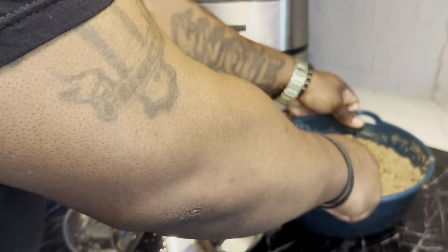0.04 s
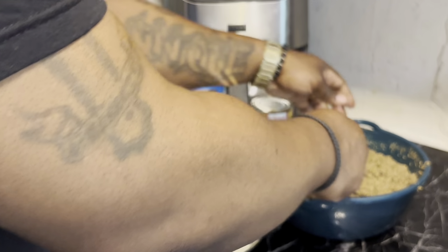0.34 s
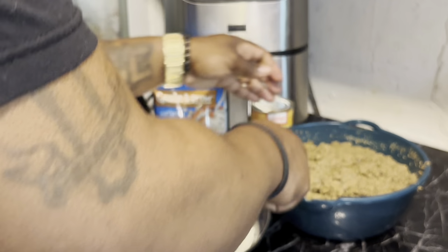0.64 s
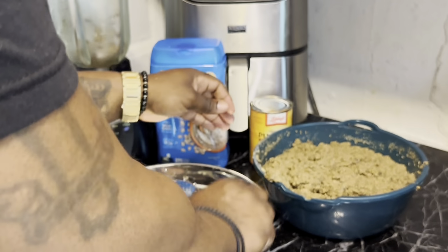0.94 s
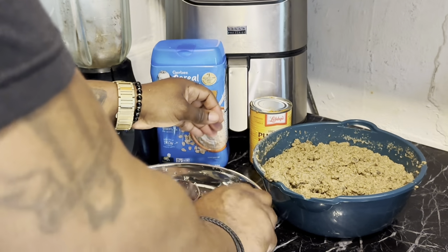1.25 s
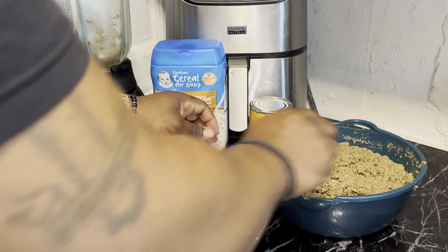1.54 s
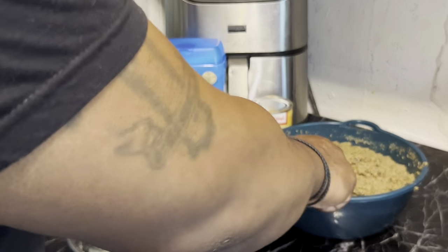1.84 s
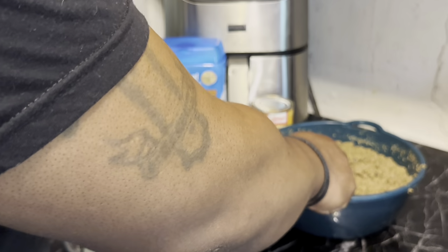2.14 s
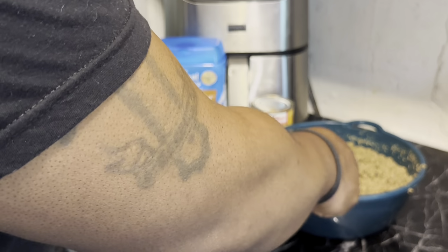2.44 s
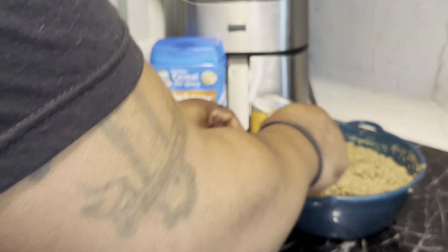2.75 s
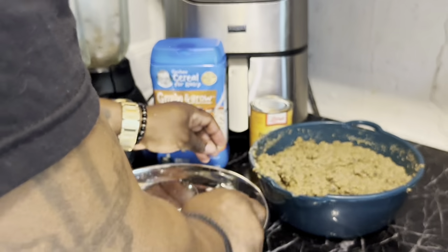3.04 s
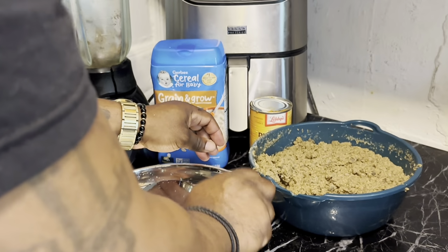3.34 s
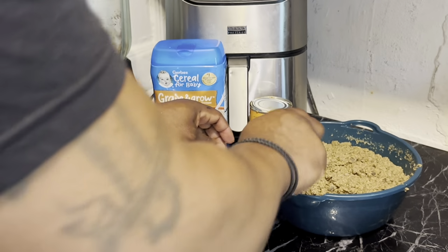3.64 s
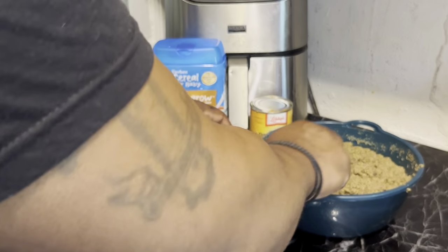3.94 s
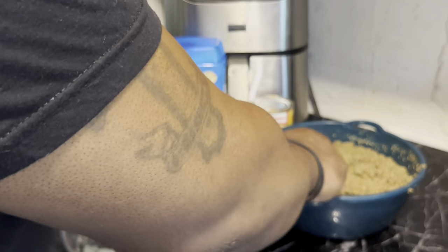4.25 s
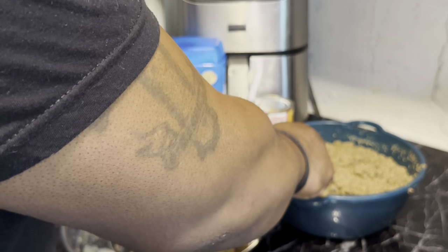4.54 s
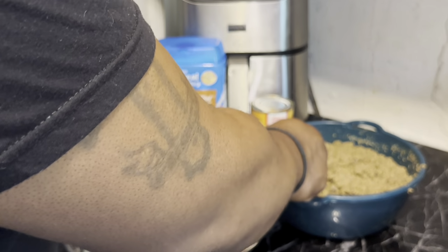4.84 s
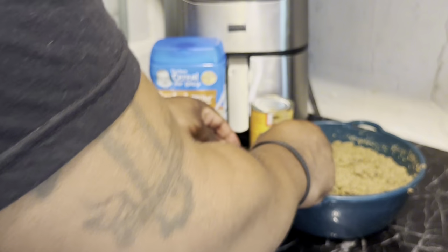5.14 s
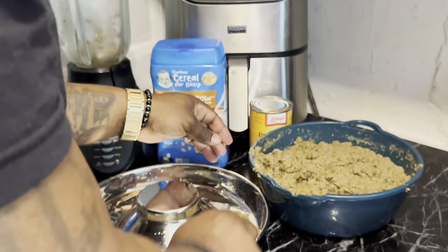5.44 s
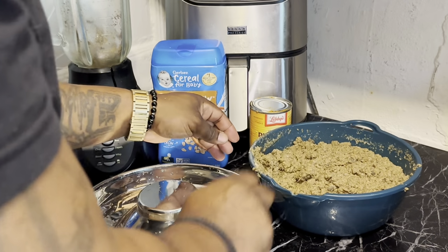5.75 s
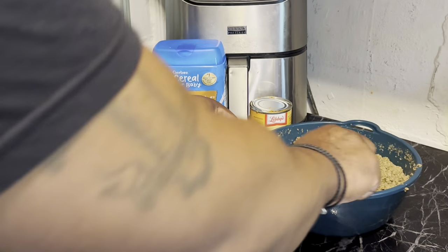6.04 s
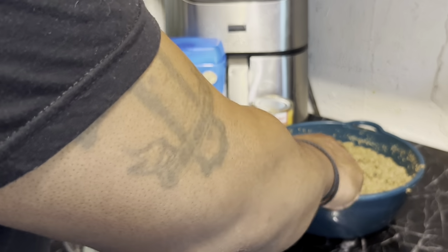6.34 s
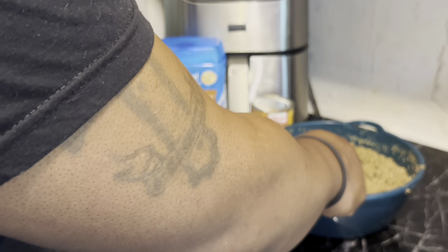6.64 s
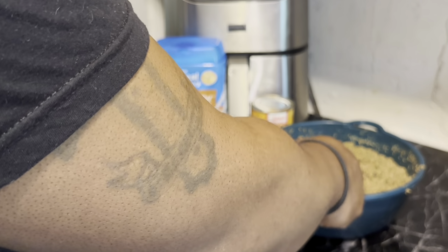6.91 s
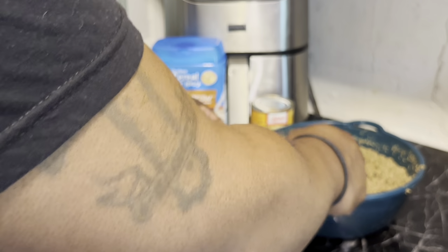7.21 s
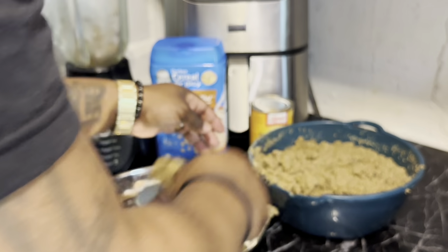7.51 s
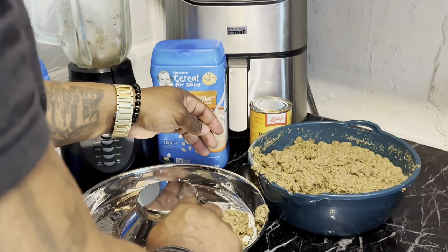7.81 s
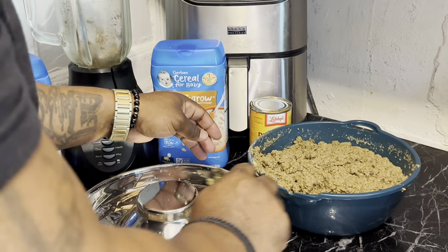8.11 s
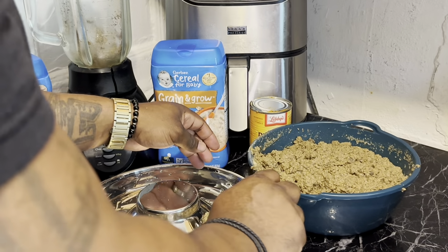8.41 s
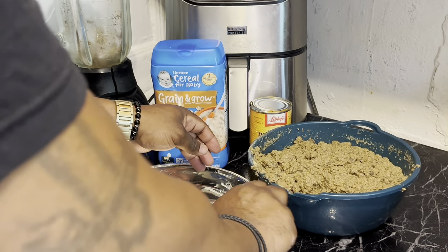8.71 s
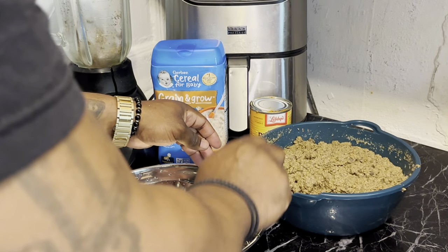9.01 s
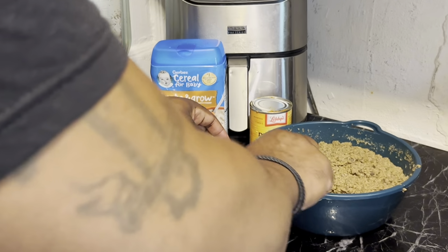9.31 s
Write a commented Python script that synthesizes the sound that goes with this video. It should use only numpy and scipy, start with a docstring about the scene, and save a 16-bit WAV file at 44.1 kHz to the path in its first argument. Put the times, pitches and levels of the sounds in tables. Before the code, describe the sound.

A metal scoop softly digs moist, crumbly food from a plastic tub and knocks and clinks against a steel bowl in a small kitchen.

```python
"""A metal scoop digs moist, crumbly food out of a plastic tub, which bumps on the counter.
At 1 s the scoop is knocked on a steel bowl: the bowl thuds and both metals ring. More digging
follows, and at 3 s and 5.5 s the full scoop chatters along the bowl's wall, muffled by food.
After a last dig, a hard knock lands on the bowl's bottom at 7.7 s and a light clink comes at 8.7 s.
All along, a small kitchen echoes briefly and an appliance hums softly."""
import sys
import numpy as np
from scipy import signal
from scipy.fft import rfft, irfft, next_fast_len
from scipy.io import wavfile
from scipy.ndimage import map_coordinates

SR = 44100
rng = np.random.default_rng(int(sys.argv[2]) if len(sys.argv) > 2 else 0)


def wav_record(signal):
    """Record a signal, one row per channel, as 16-bit PCM in the file named by sys.argv[1]."""
    frames = np.transpose(np.atleast_2d(signal))
    bounded = np.clip(frames, -1, 1)
    # unit amplitude maps onto the largest positive 16-bit level
    quanta = np.round(bounded * 32767).astype(np.int16)
    wavfile.write(sys.argv[1], SR, quanta)


N = 413216

# The scoop hits the bowl. A fade time, or t60, is how long a sound takes to drop by 60 dB.
# t/s, knock/dB, clack/dB, clack pitch/Hz, clack fade/s, bowl ring/dB, place (0 wall, 1 bottom),
# scoop ring/dB, time until the hand damps the ring/s, time until the bounce/s
BLOWS = [(1.0164, -3.5, -11, 1310, 0.064, -24.5, 0.092, -47.5, 0.19, 0.0027),
         (7.6526, 0, -18.5, 1800, 0.079, -21.5, 1, -58, 0.33, 0.026),
         (8.711, -35, -16.5, 2180, 0.11, -51, .1, -35.5, 0.24, .004)]


def scoop_blows():
    """The scoop hits the bowl and bounces once, lighter and brighter; both ring until a hand damps them."""
    out = np.zeros(N)
    for s, knock_db, clack_db, clack_hz, clack_t60, bowl_db, place, scoop_db, free_s, bounce_s in BLOWS:
        add(out, s, contact(knock_db, clack_db, clack_hz, clack_t60))
        add(out, s, metal_ring(bowl_db, place, scoop_db, free_s, damping_t60=0.97))
        add(out, s + bounce_s, contact(knock_db - 18, clack_db - 12, clack_hz=5600, clack_t60=clack_t60))
    return out


# Light touches along the bowl's wall: t/s, clack level/dB, clack pitch/Hz
CHATTER = [(2.993, -24.5, 5570), (3.0135, -26, 1340), (3.031, -23, 5010), (3.044, -24, 8820),
           (3.056, -28, 3050), (3.062, -25, 5500), (3.0846, -22, 3700), (3.089, -27, 1340),
           (5.4903, -21.5, 4370), (5.496, -18.5, 1296)]


def scoop_chatter():
    """The full scoop rattles along the wall, and the food starts to muffle the ring almost at once."""
    out = np.zeros(N)
    for s, db, hz in CHATTER:
        add(out, s, contact(knock_db=db - 22, clack_db=db, clack_hz=hz, clack_t60=0.063, flex_db=-1.5))
        add(out, s, metal_ring(db - 26, place=0, scoop_db=db - 30.5, free_s=0.0088, damping_t60=0.34))
    return out


# The tone of a dull knock and of a bright clack: f/Hz, level/dB
KNOCK_TONE = [(60, -40), (190, -47), (310, -6.5), (480, 3), (780, -3), (1020, -4.5), (1420, -0.5),
              (2000, -14), (4000, -29.5), (15000, -62)]
CLACK_TONE = [(150, -5.5), (750, -13.5), (1050, -3.5), (1400, 0.5), (1800, -4.5), (2300, -5.5), (3050, -1),
              (3800, -13.5), (4700, -12), (5600, -5), (6800, -10.5), (10000, -13.5), (15000, -14.5)]


def contact(knock_db, clack_db, clack_hz, clack_t60, flex_db=-3):
    """Metal meets metal: a patch of wall bends to and fro briefly, with a knock and a clack."""
    hz = np.geomspace(100, 16000, 120)
    # the spot that is hit favours the pitches near clack_hz
    lift_db = 8 * np.exp(-(np.log2(hz / clack_hz) / 0.28) ** 2)
    tone = np.transpose([hz, along(CLACK_TONE, hz) + lift_db])
    out = swing(clack_db + flex_db, clack_hz, t60=0.034)
    add(out, 0, amp(knock_db) * burst(KNOCK_TONE, t60=0.023))
    add(out, 0, amp(clack_db) * burst(tone, clack_t60, rise_s=0.00091))
    return out


# The steel bowl's own notes: f/Hz, level if hit on the wall/dB, level if hit on the bottom/dB, fade/s
BOWL_NOTES = [(309.4, -2.5, -1.5, 0.28), (419, 12, -24, 0.097), (562, -15, -3, 0.63),
              (1072, -27, -19, 0.55), (1100, -34, -24, 0.18), (1355, -4, -17.5, 0.31), (1398, 2, -3, 0.17),
              (1435, -8, 0, 0.23), (1516, -15, -3, 0.21), (1570, -35, -25, 0.64), (1640, -21, -24, 1),
              (1877, -6.5, -12, 0.44), (2545, -22, -28, 0.8), (2580, -12, -34, 0.82), (2780, -21, -41, 1),
              (2970, -8.5, -36, 0.38), (3050, -18, -8, 0.24), (3260, -4, -20, 0.23), (3440, -21, -49, 1),
              (3910, 1, -13, 0.057), (4160, -33, -49, 0.57), (4750, -20.5, -49, 0.73),
              (4800, -27, -42, 0.26), (4940, -17, -47, 0.77), (5570, -4, -13, 0.076), (6200, -21, -45, .33),
              (6050, -24, -44, 0.14), (6370, -25, -48, 0.56), (8400, -15, -36, 0.27)]
# The metal scoop's own notes: f/Hz, level/dB, fade/s
SCOOP_NOTES = [(1500, -9, 0.13), (1820, -7.5, 2.2), (1890, -31, 0.54), (2120, -13, 2.3), (2396, -6, 0.44),
               (2830, -9, 0.72), (3130, -11, 0.61), (4100, 4, 0.32), (4190, 10, 0.14), (4260, -2.5, 0.47),
               (4570, -17, 0.41), (5450, -18, 0.53), (5803, -9, 0.44), (6300, -15, 0.21), (6600, -3, 0.41),
               (7154, -2, 0.3), (7960, -12, 0.37), (8140, -2, .25), (9450, -19, 0.18), (12670, 1, 0.22),
               (12900, -12, 0.29), (13500, -17, .27), (13800, -18, .24)]


def metal_ring(bowl_db, place, scoop_db, free_s, damping_t60):
    """Bowl and scoop ring freely, then die away faster once something soft rests on them."""
    hz, wall_db, bottom_db, t60 = np.transpose(BOWL_NOTES)
    note_db = wall_db + place * (bottom_db - wall_db)  # the bottom favours the low notes
    out = amp(bowl_db) * beating_notes(hz, note_db, t60)
    out += amp(scoop_db) * beating_notes(*np.transpose(SCOOP_NOTES))
    # the scoop's many weaker notes blur into a jangle
    add(out, 0, amp(scoop_db + 2) * burst(CLACK_TONE, t60=0.35))
    touched_s = np.maximum(clock(len(out)) - free_s, 0)
    return out * fade(touched_s, damping_t60)


def beating_notes(hz, db, t60, detune=0.008):
    """The metal is not quite round, so each note has a close twin that makes it waver."""
    hz, db, t60 = hz[:, None], db[:, None], t60[:, None]
    gain = amp(db + rng.standard_normal(hz.shape))
    t = clock(SR * 3 // 4)
    phase = 2 * np.pi * hz * t
    twin = 0.67 * np.cos(phase * (1 + detune * rng.standard_normal(hz.shape)))
    sign = rng.choice([-1, 1], hz.shape)
    return np.sum(gain * sign * fade(t, t60) * (np.sin(phase) + twin), axis=0)


# The bowl is pushed against the counter: t/s, level/dB, f/Hz
THUDS = [(1.0172, -2.5, 350), (2.995, -22, 342), (5.53, -33, 330), (7.653, -5.5, 476), (8.712, -30, 311)]
# The notes in one thud: multiple of its pitch, level/dB, fade/s
THUD_NOTES = [(1, 1, 0.059), (1.2, -6, 0.055), (1.43, -1, .036), (2.3, 6, 0.017)]


def bowl_thuds():
    """The loaded bowl thuds on the counter; the lighter the thud, the duller it sounds."""
    out = np.zeros(N)
    for s, db, hz in THUDS:
        for multiple, note_db, t60 in THUD_NOTES:
            dulling_db = 0.38 * db * np.log2(multiple)
            add(out, s, swing(db + note_db + dulling_db, hz * multiple, t60))
    return out


# The scoop taps or scrapes the tub and the packed food: t/s, level/dB, strongest f/Hz, fade/s
DIGS = [(.015, -32, 7040, 0.021), (.102, -25.5, 2510, 0.033), (0.1263, -20, 560, 0.036),
        (.146, -35, 650, 0.039), (.338, -40, 1500, 0.065), (1.7899, -28.5, 1950, 0.059),
        (1.847, -31, 1230, 0.071), (4.25, -35.5, 5060, 0.1), (4.402, -40, 4320, 0.14),
        (5.71, -44, 447, 0.28), (6.157, -39.5, 6460, .03), (6.221, -27.5, 3650, 0.023),
        (6.331, -32.5, 5550, 0.11), (6.391, -32, 1900, 0.038), (7.086, -39, 440, 0.12),
        (7.19, -44, 330, .1), (7.29, -42, 450, 0.13), (7.35, -42, 350, 0.068)]


def tub_taps():
    """Plastic does not ring, so each tap or scrape is a short puff of noise around one pitch."""
    out = np.zeros(N)
    for s, db, hz, t60 in DIGS:
        hump = [(hz / 6, -17), (hz / 1.48, -2), (hz, 0), (hz * 1.32, -4), (hz * 4, -22), (hz * 16, -40)]
        add(out, s, amp(db) * burst(hump, t60, rise_s=t60 / 45))
    return out


# The tub or the bowl rocks on the counter: t/s, level/dB, f/Hz
BUMPS = [(.111, -19, 138), (0.126, -17, 344), (.132, -20, 136), (.141, -18.5, 63), (.146, -20, 198),
         (7.655, -10, 223), (7.721, -26.5, 75)]


def counter_bumps(cycles=9.2):
    """Each rock on the counter gives a dull bump that dies away in a few swings."""
    out = np.zeros(N)
    for s, db, hz in BUMPS:
        add(out, s, swing(db, hz, t60=cycles / hz, rise_s=0.0016))
    return out


# The scoop presses into the food: t/s, length/s, crumbling/dB, wet crackle/dB
PRESSES = [(0, 0.026, -43.5, -46), (0.108, 0.15, -48, -49.5), (0.311, 0.082, -56.5, -50.5),
           (0.617, 0.027, -69, -57), (0.755, .04, -53.5, -60), (1.704, 0.31, -53.5, -55.5),
           (1.8, 0.11, -52, -53.5), (2.297, 0.34, -62.5, -61.5), (2.43, 0.048, -56.5, -61),
           (2.798, .035, -58.5, -63), (3.83, 0.17, -64, -63.5), (4.265, 0.19, -53.5, -52),
           (4.547, 0.23, -64, -59.5), (5.46, .04, -47.5, -58), (6.16, 0.08, -45, -47),
           (6.305, .07, -48.5, -55), (6.48, 0.36, -60.5, -68), (6.995, 0.33, -66, -69)]
# Moist food lets go with a tick: t/s, level/dB
TICKS = [(0.6214, -45), (0.7682, -39), (0.845, -50), (0.8889, -41.5), (2.4524, -35), (2.8105, -45),
         (2.8923, -47), (4.1744, -54), (4.8653, -47), (6.5114, -38), (6.6214, -48), (6.782, -52),
         (6.9162, -59), (7.0135, -46), (7.3058, -52), (7.3322, -50)]
# The tone of breaking crumbs, dull mush and wet smacks: f/Hz, level/dB
CRUMB_TONE = [(150, -2), (450, -23), (900, -8.5), (1700, -5), (2400, -3.5), (3200, -6), (4700, -2.5),
              (6500, 3.5), (9000, -6.5), (12000, -21), (16000, -11)]
MUSH_TONE = [(100, -15), (250, -1.5), (450, -4), (900, 2.5), (1500, -28), (4000, -27)]
SMACK_TONE = [(3000, -41), (6500, -11), (9000, -3), (14500, 3), (16000, 6.5)]


def food():
    """The moist food crumbles under the scoop, gives way dully, and crackles as it comes unstuck."""
    crumbling, wetness = np.zeros(N), np.zeros(N)
    for s, length_s, crumbling_db, wetness_db in PRESSES:
        add(crumbling, s, amp(crumbling_db) * press(length_s))
        add(wetness, s, amp(wetness_db) * press(length_s))
    crumbs = amp(-2) * tiny_pops(CRUMB_TONE, per_s=2000, spread_db=4, centre_hz=4310, cycles=3.9)
    mush = amp(-4) * tiny_pops(MUSH_TONE, per_s=500, spread_db=6, centre_hz=700, cycles=0.6)
    smacks = amp(-2) * tiny_pops(SMACK_TONE, per_s=1600, spread_db=3, centre_hz=11000, cycles=1.7)
    wetness *= amp(2.5 * wobble(per_s=35))  # the crackle comes in spurts
    yielding = amp(1.5 * wobble(per_s=24))  # the food gives way in fits and starts
    out = yielding * (crumbling * (crumbs + mush) + wetness * smacks)
    for s, db in TICKS:
        add(out, s, amp(db - 1.5) * burst(SMACK_TONE, t60=0.05))
    return out


# The scoop slides through the food: t/s, length/s, level/dB
SLIDES = [(1.797, 0.14, -58), (2.402, 0.24, -73), (4.298, 0.6, -59.5), (6.206, 0.54, -61),
          (6.942, 0.44, -62)]
# The tone of the sliding scoop, with two peaks: f/Hz, level/dB
RUB_TONE = [(500, -25), (1500, -11.5), (1900, -11), (2450, -2), (3100, -12), (4100, -7), (4850, 0),
            (5700, -5.5), (7000, -17), (12000, -42)]


def rubbing():
    """The scoop slips through the food, and countless tiny catches blend into a soft rub."""
    force = np.zeros(N)
    for s, length_s, db in SLIDES:
        add(force, s, amp(db) * press(length_s))
    friction = tiny_pops(RUB_TONE, per_s=4000, spread_db=2, centre_hz=3580, cycles=1.4)
    roughness = amp(3 * wobble(per_s=18))
    return force * roughness * friction


def press(length_s, rise_s=0.012):
    """The force of one press builds, holds and lets go."""
    t = clock()
    return np.minimum(t / rise_s, 1) * fade(np.maximum(t - length_s, 0), t60=0.17)


# How long the kitchen's echo lasts at each pitch: f/Hz, fade/s
ECHO_FADES = [(80, 0.65), (400, 0.13), (2000, 0.22), (6000, 0.3), (15000, 0.19)]


def wall_echo(x, delay_s=0.0051):
    """Close walls throw the sound back as a short blur in which the bass lasts longest."""
    hz, t, spectrum = signal.stft(rng.standard_normal(SR // 2), SR, nperseg=256)
    spectrum *= fade(t, along(ECHO_FADES, hz)[:, None])
    tail = signal.istft(spectrum, SR, nperseg=256)[1]
    tail *= np.clip(clock(len(tail)) / delay_s - 1, 0, 1)
    return signal.fftconvolve(x, tail / np.linalg.norm(tail))[:N]


# The tone of the kitchen's background noise: f/Hz, level/dB
ROOM_TONE = [(13, -38), (22, -27), (38, -9.5), (61, 1), (97, -12.5), (182, -13), (306, -16.5), (361, -14.5),
             (698, -21.5), (801, -24), (1590, -24.5), (3160, -33), (5620, -38), (11200, -58.5),
             (15500, -49)]
# The phone's sound processing lets the background rush swell around loud knocks: t/s, lift/dB
SWELLS = [(.05, 8.5), (1.02, 4), (7.65, 12.5), (8.71, 5.5)]


def background_noise(rumble_db=-47.5, air_db=-49.5, split_hz=180, rise_s=0.044, sink_s=0.51):
    """A steady low rumble lies under a soft rush, which is turned up at the listed times and sinks back."""
    t = clock(N)
    noise = unit(colour(rng.standard_normal(N), ROOM_TONE))
    rumble = signal.sosfiltfilt(signal.butter(3, split_hz, fs=SR, output="sos"), noise)
    lift_db = np.zeros(N)
    for s, db in SWELLS:
        add(lift_db, s, db * np.minimum(t / rise_s, 1) * np.exp(-t / sink_s))
    return amp(rumble_db) * rumble + amp(air_db + lift_db) * (noise - rumble)


# The notes of the humming appliance: f/Hz, level/dB
HUM_NOTES = [(59.2, -59.5), (183.0, -66.5), (360.7, -61.5), (387.6, -67.5)]


def appliance_hum():
    """A few low notes, each wavering a little in loudness and pitch."""
    out = np.zeros(N)
    for hz, db in HUM_NOTES:
        peak = np.sqrt(2) * amp(db + 2.4 * wobble(per_s=11))
        out += peak * np.sin(2 * np.pi * hz * clock(N) + wobble(per_s=18))
    return out


def swing(db, hz, t60, rise_s=0.0019):
    """A surface swings and soon settles; the air follows how fast its speed changes."""
    t = clock()
    speed = np.sin(2 * np.pi * hz * t) * fade(t, t60) * (1 - np.exp(-t / rise_s))
    return amp(db) * np.gradient(speed) * SR / (2 * np.pi * hz)


def burst(tone, t60, rise_s=0.0006):
    """Many crowded notes that die quickly, heard as a puff of noise."""
    t = clock(SR // 4)
    envelope = fade(t, t60) * (1 - np.exp(-t / rise_s))
    noise = colour(rng.choice([-1, 1], len(t)) * envelope, tone)
    return unit(noise) * np.sqrt(np.mean(envelope ** 2))


def tiny_pops(tone, per_s, spread_db, centre_hz, cycles):
    """A stream of tiny pops of uneven size and pitch, with the loud ones in clumps."""
    t = clock(160)
    when, pitch, strength = rng.random((int(per_s * N / SR), 3)).T
    start = (when * N).astype(int)
    hz = np.minimum(centre_hz * 2 ** (3 * pitch[:, None] - 1.5), SR / 2)
    size_db = spread_db * np.minimum(-np.log1p(-strength), 3)  # many small, few big
    clump_db = 3 * wobble(per_s=70)[start]
    pops = amp(size_db + clump_db)[:, None] * np.sin(2 * np.pi * hz * t) * np.exp(-t * hz / cycles)
    positions = start[:, None] + np.arange(len(t))
    stream = np.bincount(positions.ravel(), pops.ravel(), N)[:N]
    return unit(colour(stream, tone))


def colour(x, tone, keep_power=True):
    """Filter a sound with a tone curve of f/Hz, level/dB points."""
    size = 2 * next_fast_len(len(x) // 2 + 2048)
    gain = amp(along(tone, np.fft.rfftfreq(size, 1 / SR)))
    cepstrum = irfft(np.log(unit(gain) if keep_power else gain), size)
    # this fold keeps the filter from sounding before its input does
    cepstrum[1:size // 2] *= 2
    cepstrum[size // 2 + 1:] = 0
    return irfft(rfft(x, size) * np.exp(rfft(cepstrum)), size)[:len(x)]


def amp(db):
    """Turn decibels into a gain."""
    return 10 ** (np.asarray(db) / 20)


def unit(x):
    """Scale to an average (rms) level of 1."""
    return x / np.sqrt(np.mean(x ** 2) + 1e-20)


def along(points, hz):
    """Read between (f/Hz, value) points, giving each octave equal room."""
    point_hz, values = np.transpose(points)
    return np.interp(np.log(hz + 1), np.log(point_hz + 1), values)


def clock(samples=SR):
    """The time of each sample, one second's worth by default."""
    return np.arange(samples) / SR


def fade(t, t60):
    """Drop by 60 dB every t60 seconds."""
    return np.exp(-np.log(1000) * t / t60)


def wobble(per_s):
    """A smooth curve through per_s random values a second."""
    values = rng.standard_normal(int(N * per_s / SR) + 4)
    return map_coordinates(values, [np.arange(N) * per_s / SR])


def add(track, s, sound):
    """Mix a sound in at s seconds."""
    part = track[max(round(s * SR), 0):][:len(sound)]
    part += sound[:len(part)]


def scene():
    """The bowl stands nearer than the tub, so it has less echo."""
    near = scoop_blows() + scoop_chatter() + bowl_thuds()
    far = tub_taps() + counter_bumps() + food() + rubbing()
    echo = wall_echo(amp(-10.5) * near + amp(-6) * far)
    return (near + far + echo + background_noise() + appliance_hum())[None]


# The microphone's opening cuts two narrow dips in the treble: f/Hz, level/dB
MIC_TONE = [(7150, -0.5), (7500, -24), (7850, 1), (10100, -5.5), (10900, -16.5), (11250, -42), (11700, -19),
            (12400, -1)]


def record(dry, hiss_db=-76, top_hz=15950):
    """The sound is coloured, gains a faint hiss, clips at its loudest peaks and loses the top treble."""
    x = colour(dry[0], MIC_TONE, keep_power=False) + amp(hiss_db) * rng.standard_normal(N)
    size = next_fast_len(N + SR // 2)
    in_range = np.fft.rfftfreq(size, 1 / SR) < top_hz
    return irfft(rfft(np.clip(x, -1, 1), size) * in_range, size)[None, :N]


dry = scene()
out = record(dry)
wav_record(out)
```